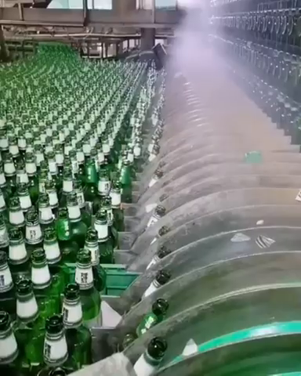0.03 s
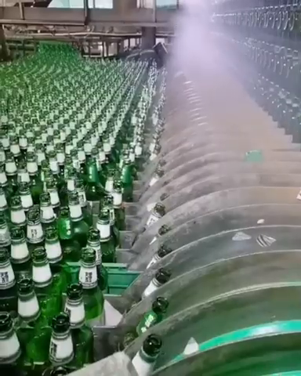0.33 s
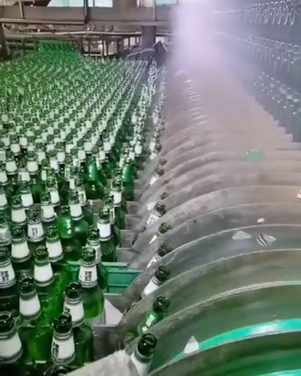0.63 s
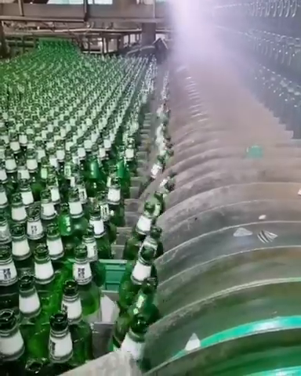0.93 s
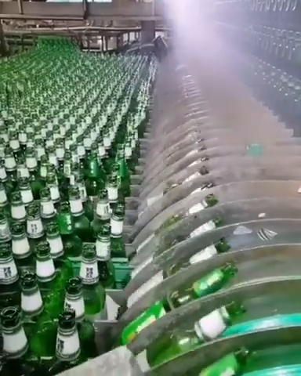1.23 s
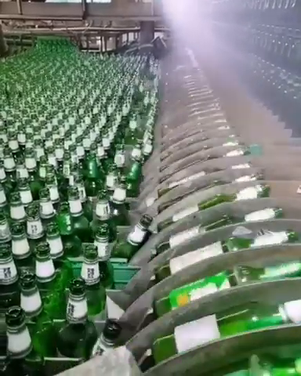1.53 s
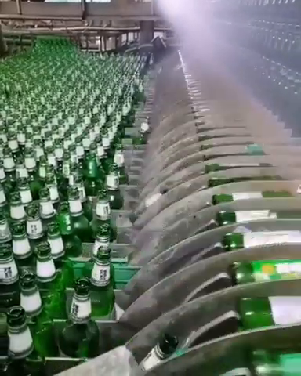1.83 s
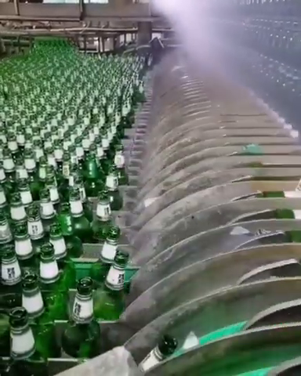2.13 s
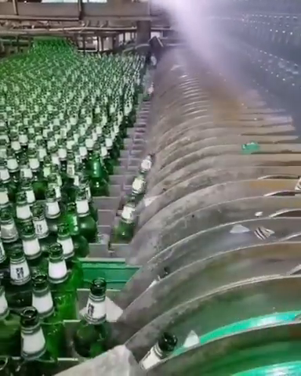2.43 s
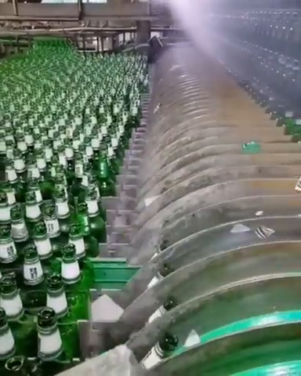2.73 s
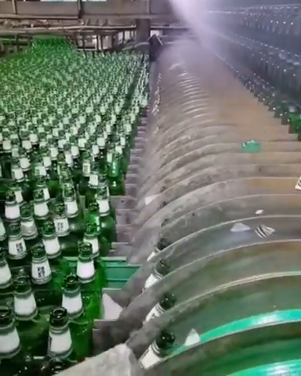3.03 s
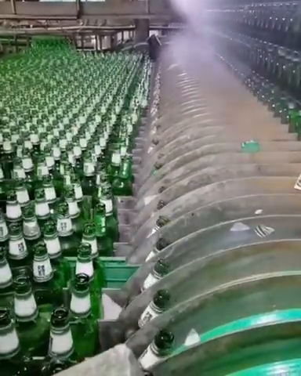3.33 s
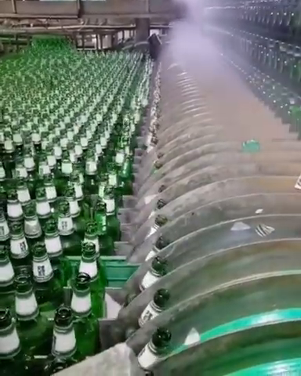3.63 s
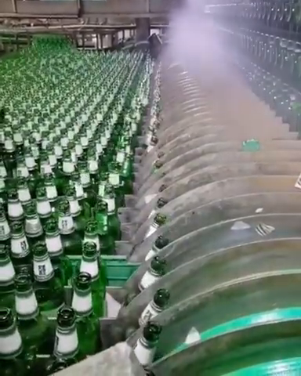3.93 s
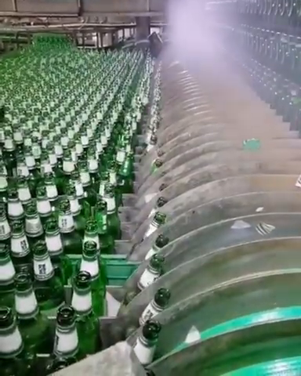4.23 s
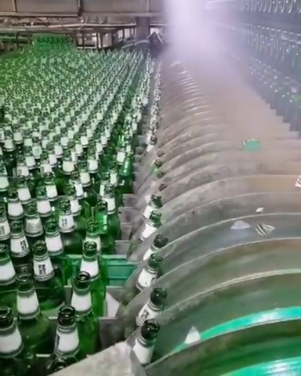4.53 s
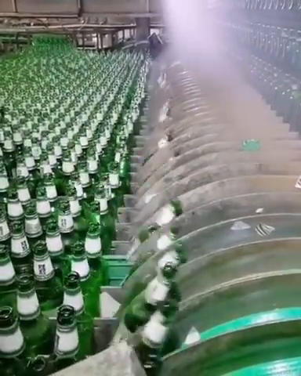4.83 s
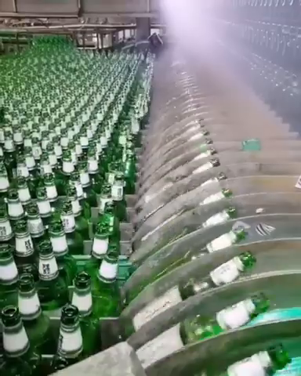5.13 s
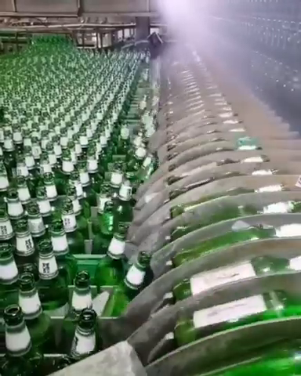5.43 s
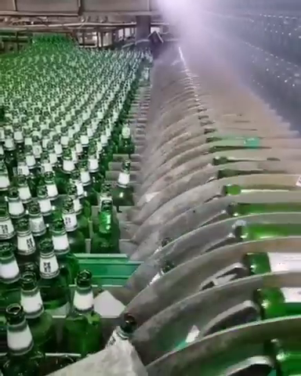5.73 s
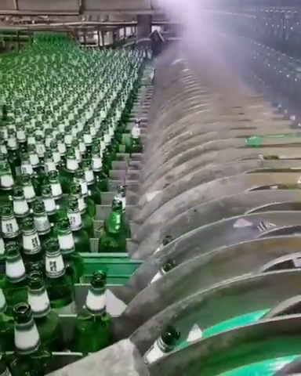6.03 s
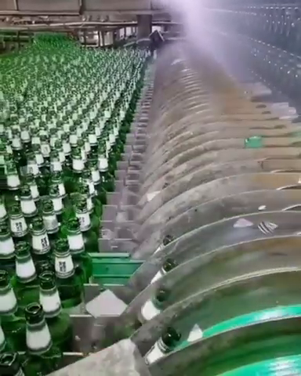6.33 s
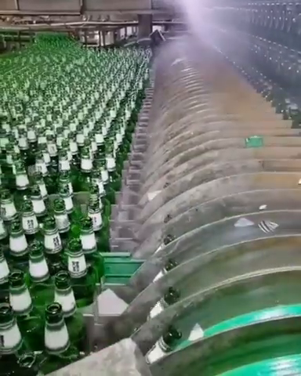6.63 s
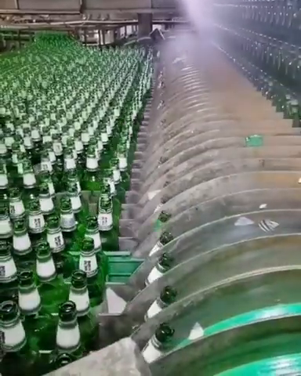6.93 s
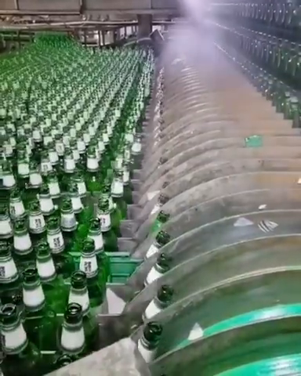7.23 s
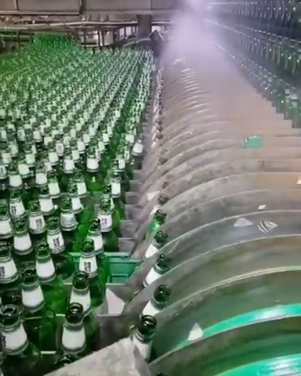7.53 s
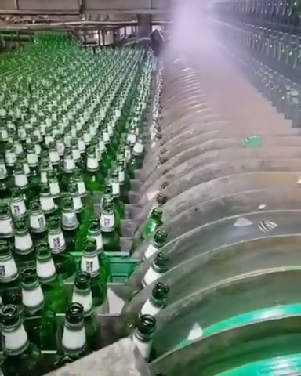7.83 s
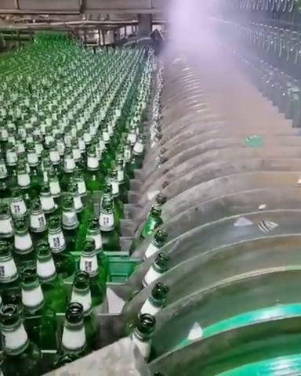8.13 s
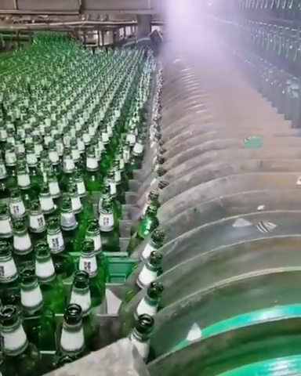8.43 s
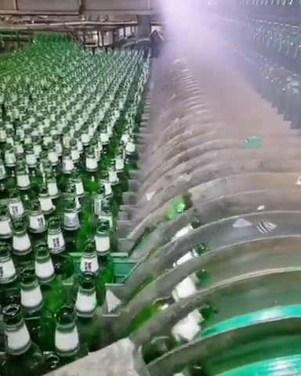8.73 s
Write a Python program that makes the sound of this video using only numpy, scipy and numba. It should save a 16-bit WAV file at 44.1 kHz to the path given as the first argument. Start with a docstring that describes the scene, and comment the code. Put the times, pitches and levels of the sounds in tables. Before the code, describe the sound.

A bottle washing machine roars and hisses with water while masses of glass bottles clink and rattle, clattering louder as rows tip over.

```python
"""A roar of pumps and falling water fills a large, hard-walled hall: a bottle washer's discharge end.
Jets hiss, pipes drone, and thousands of glass bottles jostle on the conveyor, each contact ringing
a bottle's modes. Every 3.8 s a row is tipped over the steel guides: it clinks, slides, judders and
rings, and the drive groans. A gain control turns everything down when the glass gets loud."""
import sys
import numpy as np
from scipy import signal
from scipy.fft import rfft, irfft, next_fast_len
from scipy.io import wavfile
from scipy.ndimage import uniform_filter1d
from numba import njit

SR = 44100
rng = np.random.default_rng(int(sys.argv[2]) if len(sys.argv) > 2 else 0)


def bounce(signal):
    """Save signal as a 16-bit WAV file at the path given by the first command-line argument."""
    frames = np.transpose(np.atleast_2d(signal))
    limited = np.clip(frames, -1, 1)
    pcm = np.round(limited * 32767).astype(np.int16)
    wavfile.write(sys.argv[1], SR, pcm)


N = 387638
TIME_S = np.arange(N) / SR


def from_db(db):
    """Decibels to gain."""
    return np.exp(np.asarray(db) * (np.log(10) / 20))


def rms_one(x):
    """Scale to rms 1."""
    return x / np.sqrt(np.mean(x ** 2) + 1e-20)


def fader(points):
    """Gain at every sample, riding a curve of times and decibels."""
    return from_db(np.interp(TIME_S, *np.transpose(points)))


def at_hz(points, hz):
    """Read a spectrum on a log-frequency axis."""
    points_hz, values = np.transpose(points)
    return np.interp(np.log(hz), np.log(points_hz), values)


def arch(s, length):
    """A rounded swell from 0 to 1 and back."""
    return np.sqrt(np.clip(1 - (2 * (TIME_S - s) / length - 1) ** 2, 0, 1))


def swells(rows):
    """The summed gain of a table of swells."""
    return sum(from_db(db) * arch(s, length) for s, length, db in rows)


def add(out, s, sound):
    """Mix a short sound in at a time."""
    at = round(s * SR)
    out[:, at:at + sound.shape[1]] += sound[:, :N - at]


def drift(rate_hz):
    """A slow random wander of rms 1."""
    hop, run_in = 40, 2000
    r = np.exp(-2 * np.pi * hop * rate_hz / SR)
    white = rng.standard_normal(N // hop + run_in + 2)
    slow = signal.lfilter([1], [1, -2 * r, r * r], white)[run_in:]
    return np.interp(np.arange(N) / hop, np.arange(len(slow)), rms_one(slow))


def ring(clicks, hz, t60):
    """A unit click sets a sine of height 1 ringing."""
    r, w = from_db(-60 / (t60 * SR)), 2 * np.pi * hz / SR
    return signal.lfilter([0, np.sin(w)], [1, -2 * r * np.cos(w), r * r], clicks + 1e-18)


@njit
def pings(starts, poles, left, right, swell, length):
    """Damped sines that swell briefly, each with its own complex strength left and right."""
    out = np.zeros((2, N))
    for k in range(len(starts)):
        wave, lack = 1 + 0j, 1.
        for i in range(starts[k], min(starts[k] + length, N)):
            out[0, i] += (1 - lack) * (wave * left[k]).real
            out[1, i] += (1 - lack) * (wave * right[k]).real
            wave *= poles[k]
            lack *= swell
    return out


def hall(x, wet_db, t60=0.92, cut_hz=1500):
    """Hard walls: six feedback delays a side, duller on every round, added to the direct sound."""
    echoes, dull = np.zeros((2, N)), np.exp(-2 * np.pi * cut_hz / SR)
    for k, lag in enumerate((rng.uniform(0.02, 0.071, size=12) * SR).astype(int)):
        loop, state = x[k % 2].copy(), [0.]
        gain = from_db(-60 * lag / SR / t60)
        for i in range(lag, N, lag):
            back, state = signal.lfilter([gain * (1 - dull)], [1, -dull], loop[i - lag:i], zi=state)
            loop[i:i + lag] += back[:N - i]
        echoes[k % 2] += (loop - x[k % 2]) * (-1) ** (k // 2)
    return x + from_db(wet_db) * np.std(x) * rms_one(echoes)


# stereo image of the machine bed: f/Hz, left-right correlation
BED_CORRELATION = [(30, 0.9), (170, 0.94), (400, 0.49), (750, 0.67), (1200, -0.2), (1700, 0.62), (2300, 1),
                   (3300, -0.19), (5500, 0.97), (8500, 0.85)]
def widen(mid, side, hz):
    """Two unrelated signals become left and right, alike in the bass, of varying width above."""
    alike = np.clip(at_hz(BED_CORRELATION, hz), -1, 1)
    return np.sqrt(1 + alike) * mid + np.sqrt(1 - alike) * side * [[1], [-1]]


def turbulence(spectrum, flicker_db, surge_db, flicker_hz):
    """Half-octave bands of stereo noise that surge together and flicker on their own; rms 1."""
    edges = 2 ** np.arange(np.log2(spectrum[0][0]), np.log2(spectrum[-1][0]) + .5, .5)
    out, white = 0, rng.standard_normal((2, 2, N))
    for k, (low, high) in enumerate(zip(edges, edges[1:])):
        band = signal.butter(2, [low, high], "band", fs=SR, output="sos")
        mid, side = signal.sosfilt(band, white[k % 2])
        hz = np.sqrt(low * high)
        out += from_db(at_hz(spectrum, hz) + flicker_db * drift(flicker_hz)) * widen(mid, side, hz)
    return rms_one(out * from_db(surge_db * drift(8.6)))


# ducking of the bed: t/s, length/s, gain/dB
BED_DIPS = [(0.96, 0.13, -2), (1.52, 0.28, 0.5), (1.797, 0.05, -3.5), (4.787, 0.16, -3.5),
            (6.467, 0.028, -5), (8.595, .2, -2.5)]
def ducking(fall_s=0.023, recover_s=0.039):
    """The bed dips briefly at set times, where the glass is loudest."""
    gain_db = 0
    for s, length, db in BED_DIPS:
        age = TIME_S - s
        gain_db += db * np.clip(np.minimum(age / fall_s, 1 + (length - age) / recover_s), 0, 1)
    return from_db(gain_db)


# flow of water through the machine: t/s, level/dB
WATER_FLOW = [(0.3, -14.5), (2.3, -16), (4.7, -15.5), (5.6, -17), (8.78, -17)]
# swells of the machine's rumble: t/s, length/s, level/dB
RUMBLE_SURGES = [(0.48, 0.32, -22.5), (1.33, 0.18, -43), (1.96, 0.35, -22.5), (2.26, 0.21, -22.5),
                 (3.58, 0.087, -18.5), (4.1, 0.18, -22.5), (4.6, 0.16, -31)]
def flow_and_surges():
    """The gains of the running water and of the machine's surges, both ducked."""
    duck = ducking()
    return duck * fader(WATER_FLOW), duck * swells(RUMBLE_SURGES)


# colour of the falling water: f/Hz, relative density/dB
ROAR_SPECTRUM = [(150, -10), (260, -1), (390, -0.5), (550, 1.5), (760, 0.5), (1000, 0.5), (1300, 0.5),
                 (1800, -5), (2450, -13), (3400, -7.5), (4500, -22)]
def water_roar(flow, surging, lag_s=0.00013):
    """Water roars and swells with the rumble; the washer stands on the right, so the left lags."""
    gain = np.hypot(flow, from_db(-8) * surging)
    left, right = gain * turbulence(ROAR_SPECTRUM, flicker_db=2.0, surge_db=1.06, flicker_hz=23.0)
    return np.array([np.interp(TIME_S - lag_s, TIME_S, left), right])


# the machine's low end: f/Hz, relative density/dB
RUMBLE_SPECTRUM = [(25, -6), (50, -9.5), (85, -1.5), (125, 0), (165, 2), (240, -3.5), (390, -7.5)]
def machine_rumble(flow, surging):
    """Low noise sits under the flow and rises in surges."""
    gain = np.hypot(from_db(-11.5) * flow, surging)
    return gain * turbulence(RUMBLE_SPECTRUM, flicker_db=3.0, surge_db=1.0, flicker_hz=20.6)


# colour of the spray: f/Hz, relative density/dB
JET_SPECTRUM = [(3300, 0), (3900, 5), (5500, -7), (7800, -19), (9500, -27)]
def jet_hiss(flow):
    """Water jets add a faint, flickering hiss that follows the flow."""
    return from_db(-36) * flow * turbulence(JET_SPECTRUM, flicker_db=1.5, surge_db=2, flicker_hz=25)


def drone(hz, t60):
    """A resonance kept going by random shaking; rms 1."""
    mid, side = ring(rng.standard_normal((2, N)), hz, t60)
    return rms_one(widen(mid, side, hz))


# the drive under load: t/s, length/s, level/dB
LOAD_GROANS = [(1.22, 0.13, -15), (1.96, 0.45, -19.5), (2.4, 0.25, -18.5), (5.02, 0.14, -19.5),
               (5.98, 0.066, -23), (6.26, 0.17, -21)]
def drive_groan(flow):
    """The drive rubs a resonance of the steel frame, which stands out under load."""
    return np.hypot(from_db(-14) * flow, swells(LOAD_GROANS)) * drone(hz=964.0, t60=0.07)


# resonances of pump housings and pipes: f/Hz, t60/s, level/dB
PUMP_MODES = [(151.5, .2, -45), (172.9, 0.65, -39), (199, 0.29, -43.5), (391, 0.087, -31.5),
              (715, 0.063, -32)]
def pump_drone():
    """Housings and pipes hum steadily as the pumps shake them."""
    return sum(from_db(db) * drone(hz, t60) for hz, t60, db in PUMP_MODES)


def jostle(modes, per_s, force_db, swell_s, clump_db):
    """Contacts of uneven force come in flurries, each on a bottle with a pitch of its own; rms 1."""
    out = 0
    for hz, spread, db, t60 in modes:
        mode_rng = np.random.default_rng(rng.integers(2 ** 31))
        when, force, detune, pan, phase_l, phase_r = mode_rng.random((int(per_s * N / SR), 6)).T
        starts = (when * N).astype(np.int64)
        accent_db = force_db * np.minimum(-np.log(force), 3)
        size = from_db(db + accent_db + clump_db * drift(18.0)[starts])
        pitch = hz * (1 + spread * np.arctanh(1.96 * (detune - .5)))
        poles = from_db(-60 / (t60 * SR)) * np.exp(2j * np.pi * pitch / SR)
        # scattered among the bottles, the ring reaches each side with its own phase
        left = size * np.sqrt(pan) * np.exp(2j * np.pi * phase_l)
        right = size * np.sqrt(1 - pan) * np.exp(2j * np.pi * phase_r)
        out += pings(starts, poles, left, right, np.exp(-1 / (swell_s * SR)), int(.7 * t60 * SR))
    return rms_one(out)


def knock(modes, chatter_s, bounces=5):
    """One bottle bounces a few times within milliseconds, pumping its ring up; peak 1."""
    clicks = np.zeros((2, SR // 4))
    at = (np.sort(rng.random(bounces)) * chatter_s * SR).astype(int)
    clicks[:, at - at[0]] = rng.uniform(0.045, 1, (2, bounces))
    out = 0
    for hz, spread, db, t60 in modes:
        pitch = hz * (1 + spread * rng.uniform(-0.946, 0.39))
        cushioned = ring(clicks, pitch, t60=0.002)
        out += from_db(db) * rms_one(ring(cushioned, pitch, t60))
    return out / np.abs(out).max()


# ring of a bottle's wall: f/Hz, spread/fraction, level/dB, t60/s
WALL_RING = [(3157, 0.014, -4.5, 0.095), (3070, 0.0296, -5, 0.091), (3598, 0.066, -8.5, 0.11)]
# fader ride on the crowd's ringing walls: t/s, level/dB
WALL_RIDE = [(0.46, -25.5), (1.19, -20.5), (1.63, -24.5), (2.2, -26), (2.45, -21), (3.0, -21), (3.19, -26),
             (3.6, -25), (3.98, -25.5), (4.15, -28), (4.52, -27.5), (4.96, -26), (5.58, -28), (6.15, -26.5),
             (6.49, -25.5), (6.81, -28), (7.46, -22), (7.9, -31.5), (8.35, -27), (8.7, -26)]
def crowd_walls(crashing):
    """Bottle walls ring all along the conveyor and flare when a row crashes."""
    gain = np.hypot(from_db(3.5) * fader(WALL_RIDE), from_db(-13) * crashing)
    return gain * jostle(WALL_RING, per_s=75, force_db=4.0, swell_s=0.004, clump_db=1.0)


# a bottle's hard upper modes: f/Hz, spread/fraction, level/dB, t60/s
CHINK_RING = [(6430, 0.0344, 5, 0.068), (6940, 0.03, 2.5, 0.06), (5960, 0.04, 1.5, 0.064),
              (7330, 0.01, -5.5, 0.022)]
# fader ride on the crowd's chinks: t/s, level/dB
CHINK_RIDE = [(0.46, -23), (0.95, -25), (1.08, -22.5), (2.14, -29.5), (2.5, -23), (3.08, -26.5),
              (3.98, -26.5), (4.17, -24.5), (4.6, -31), (5.27, -25.5), (5.61, -29.5), (6.06, -26),
              (8.32, -27.5), (8.5, -25)]
# runs of quick chinks along the nearest bottles: t/s, length/s, level/dB
CHINK_RUNS = [(0.99, 0.14, -24.5), (1.15, 0.08, -13), (1.33, 0.067, -15.5), (2.22, 0.062, -20),
              (3.84, 0.14, -17), (4.87, 0.069, -19), (5.05, 0.1, -21.5), (5.34, 0.035, -19),
              (5.55, 0.055, -17.5), (5.645, .11, -13.5), (6.94, 0.034, -15.5), (8.62, 0.054, -22)]
def crowd_chinks(crashing):
    """Glass on glass makes a bright sparkle that flares in runs and crashes."""
    flares = from_db(-19) * crashing + swells(CHINK_RUNS)
    gain = np.hypot(from_db(4) * fader(CHINK_RIDE), flares)
    return gain * jostle(CHINK_RING, per_s=300, force_db=2.5, swell_s=0.0033, clump_db=3.5)


# lower ring of a bottle's body: f/Hz, spread/fraction, level/dB, t60/s
BODY_RING = [(2085, .05, 2.5, 0.089), (1806, 0.091, 5, 0.058), (2758, 0.045, 1.5, 0.052),
             (2369, 0.084, 0.5, 0.062)]
def crowd_bodies(flow, pushing):
    """Bottle bodies clatter with the flow, harder while a row is pushed."""
    gain = np.hypot(from_db(-5.5) * flow, from_db(-24) * pushing)
    return gain * jostle(BODY_RING, per_s=90, force_db=1.5, swell_s=0.0059, clump_db=1.0)


# small, high ticks of glass: f/Hz, spread/fraction, level/dB, t60/s
RATTLE_RING = [(4493, 0.12, -2, 0.091), (5360, 0.065, 0, 0.068), (7410, 0.067, 1.5, 0.038),
               (8530, 0.063, -6.5, 0.055)]
def crowd_rattle(flow):
    """Dense light contacts blur into a fine rattle that follows the flow."""
    ticks = jostle(RATTLE_RING, per_s=450, force_db=3.0, swell_s=0.0048, clump_db=3.5)
    return from_db(-6.5) * flow * ticks


# wet glass scraping on steel: f/Hz, spread/fraction, level/dB, t60/s
SCRAPE_RING = [(5610, 0.11, -1.5, 0.029), (6950, 0.05, -3.5, 0.051)]
# slides along the guides: t/s, length/s, level/dB
GUIDE_SLIDES = [(1.485, 0.31, -11), (1.8, 0.12, -18.5), (5.63, 0.094, -22)]
def sliding_row():
    """Glass clatters along steel in many small, uneven jerks."""
    scrape = jostle(SCRAPE_RING, per_s=720, force_db=2.5, swell_s=0.0025, clump_db=2.0)
    return swells(GUIDE_SLIDES) * scrape


# shrill note of a juddering bottle: f/Hz, spread/fraction, level/dB, t60/s
JUDDER_RING = [(3644, .04, 0, 0.13)]
# bottles turning on their guides: t/s, length/s, level/dB
GUIDE_JUDDERS = [(1.72, 0.23, -18.5), (1.992, .06, -21.5), (3.83, 0.13, -24.5), (5.0, 0.13, -23),
                 (5.538, .065, -18.5), (5.6, .13, -15.5), (5.75, .08, -20), (7.22, 0.13, -24.5),
                 (8.63, 0.17, -22.5)]
def juddering():
    """Stick and slip strike the turning bottles in a fast, uneven chatter."""
    shrill = jostle(JUDDER_RING, per_s=870, force_db=2.0, swell_s=0.002, clump_db=0.0)
    return swells(GUIDE_JUDDERS) * shrill


# ring of the steel frame: f/Hz, spread/fraction, level/dB, t60/s
FRAME_RING = [(347, 0.14, -6.5, 0.065), (550, .1, -4.5, 0.11), (736, 0.073, 6, 0.1),
              (987, 0.072, 2.5, 0.15), (1306, 0.11, 1.5, 0.032)]
# bottles bumping the frame: t/s, frame level/dB, body level/dB
FRAME_BUMPS = [(0.348, -8, -6.5), (0.795, -9.5, -8), (1.43, -7, -5.5), (3.131, -13, -8.5), (3.661, -3, -11),
               (3.85, -11, -10.5), (4.279, -13, -9.5), (5.022, -12.5, -9.5), (5.939, -15.5, -11.5),
               (6.465, -13.5, -8), (6.921, -10, -7.5), (8.255, -8.5, -8), (8.355, -20, -9),
               (8.525, -8.5, -13.5), (8.55, -10.5, -12)]
def frame_clunks():
    """A bump shakes the frame and the bodies of the bottles in one broad, short rattle."""
    out = np.zeros((2, N))
    for s, frame_db, body_db in FRAME_BUMPS:
        for modes, db in ((FRAME_RING, frame_db), (BODY_RING, body_db)):
            add(out, s, from_db(db) * knock(modes, chatter_s=0.028, bounces=7))
    return out


# close-up hits of bottle on bottle: t/s, wall level/dB, chink level/dB
NEAR_KNOCKS = [(0.395, -11.5, -20), (0.906, -11, -10.5), (0.996, -9, -1), (1.157, -6, -1.5),
               (1.196, -3.5, -12), (1.256, -4.5, -2.5), (1.503, -16.5, -9), (1.572, -9, -7),
               (1.623, -11, -2.5), (1.679, -19, -1.5), (1.746, -16.5, -7), (2.438, -6, -11.5),
               (2.586, -7.5, -13), (2.692, -16, -12), (2.765, -2.5, -12.5), (2.929, -15, -7),
               (2.983, -11.5, -12), (3.084, -3.5, -24), (3.12, -10.5, -13), (3.192, -10.5, -17.5),
               (3.323, -15.5, -17), (3.481, -9, -12), (3.739, -13, -11.5), (3.904, -11.5, -10),
               (3.972, -9, -5), (4.72, -9.5, -19), (4.79, -10, -19.5), (4.811, -16, 2.5),
               (4.837, -17, -3.5), (4.98, -10, -0.5), (5.022, -5, -14), (5.306, -5.5, -11),
               (5.703, -17, -17.5), (6.009, -19, -12), (6.186, -7.5, -9), (6.432, -13.5, -18),
               (6.921, -9.5, -9.5), (7.304, -12, -14), (7.387, -14.5, -4.5), (8.543, -10, -9.5),
               (8.676, -13.5, -8), (8.745, -12, -12.5)]
def near_knocks():
    """Each knock rings a bottle's wall and its hard upper modes."""
    out = np.zeros((2, N))
    for s, wall_db, chink_db in NEAR_KNOCKS:
        for modes, db in ((WALL_RING, wall_db), (CHINK_RING, chink_db)):
            add(out, s, from_db(db) * knock(modes, chatter_s=0.015))
    return out


# close-up single notes: t/s, f/Hz, level/dB, t60/s, chatter/s
NEAR_CLINKS = [(1.791, 3590, -3.5, 0.29, .003), (1.819, 7300, -1, 0.15, .002),
               (1.885, 7420, -10.5, 0.18, 0.0035), (1.919, 3110, -8.5, 0.092, 0.0052),
               (4.968, 3129, 3, 0.093, 0.0022), (5.689, 3640, -5, 0.078, 0.005),
               (5.939, 2750, -9.5, 0.1, .025), (6.467, 1704, -7, 0.036, .012),
               (6.919, 2300, -17, 0.062, 0.0067), (8.259, 2350, -6, 0.061, 0.009)]
def near_clinks():
    """A bottle is struck so that one clear note rings."""
    out = np.zeros((2, N))
    for s, hz, db, t60, chatter_s in NEAR_CLINKS:
        add(out, s, from_db(db) * knock([(hz, 0, 0, t60)], chatter_s, bounces=3))
    return out


def crash(s, attack_s=0.014, decay_s=0.042):
    """Envelope of a flurry of contacts that builds quickly and dies away; peak 1."""
    age = TIME_S - s
    return np.clip(age / attack_s, 0, 1) * np.exp(-np.maximum(age - attack_s, 0) / decay_s)


# rows going over the guides: t/s, tip level/dB, landing level/dB
ROW_TIPS = [(0.99, 7, -2), (4.797, 2.5, -9.5), (8.611, -7, -7)]
def tipping_rows(push_s=0.52, landing_s=0.24):
    """Envelopes of each row: pushed up to the guides, it crashes as it tips and as it lands."""
    pushing = crashing = 0
    for s, tip_db, landing_db in ROW_TIPS:
        pushing += arch(s - push_s, push_s)
        crashing += from_db(tip_db) * crash(s) + from_db(landing_db) * crash(s + landing_s)
    return pushing, crashing


def scene():
    """Water, pumps and jets fill the hall; the glass rings on top."""
    flow, surging = flow_and_surges()
    pushing, crashing = tipping_rows()
    bed = water_roar(flow, surging) + machine_rumble(flow, surging) + jet_hiss(flow)
    drones = drive_groan(flow) + pump_drone()
    crowd = crowd_walls(crashing) + crowd_chinks(crashing)
    crowd += crowd_bodies(flow, pushing) + crowd_rattle(flow)
    close_up = sliding_row() + juddering() + near_knocks() + near_clinks() + frame_clunks()
    return bed + drones + hall(crowd + close_up, wet_db=-21.0)


# balance of the two microphones: f/Hz, left minus right/dB
MIC_BALANCE = [(150, -0.7), (255, 2), (340, -0.5), (520, -4), (820, .5), (1900, 2), (2300, -1.5),
               (3100, 0.5), (3700, -1.5), (6500, 2), (8000, 0.5)]
def microphones(x, notch_hz=4010, notch_mix=0.72):
    """Each side favours different bands; both have a notch in the treble."""
    size = next_fast_len(N + SR // 10)
    lean_db = at_hz(MIC_BALANCE, np.maximum(np.fft.rfftfreq(size, 1 / SR), 1))
    leaning = irfft(rfft(x, size) * from_db(lean_db * [[.5], [-.5]]), size)[:, :N]
    notched = signal.lfilter(*signal.iirnotch(notch_hz, Q=6, fs=SR), leaning)
    return leaning + notch_mix * (notched - leaning)


def gain_control(x, limit_db=-11, window_s=.03, release_db_per_s=49):
    """Loud glass turns everything down; the gain then recovers at a steady rate."""
    power = uniform_filter1d(np.mean(x ** 2, axis=0), int(window_s * SR))
    over_db = np.maximum(10 * np.log10(np.maximum(power, 1e-12)) - limit_db, 0)
    recovery_db = release_db_per_s * TIME_S
    return x * from_db(recovery_db - np.maximum.accumulate(over_db + recovery_db))


def record(dry):
    """The sound switches on, its level is held, peaks are rounded and the top is cut."""
    start_s, ceiling, cutoff_hz = .277, 0.96, 9650
    held = gain_control(microphones(dry))
    rounded = held / (1 + np.abs(held / ceiling) ** 6) ** (1 / 6)
    fade_in = np.clip((TIME_S - start_s) / .002, 0, 1)
    lowpass = signal.ellip(12, .2, 80, cutoff_hz, fs=SR, output="sos")
    return signal.sosfilt(lowpass, fade_in * rounded)


dry = scene()
out = record(dry)
bounce(out)
```